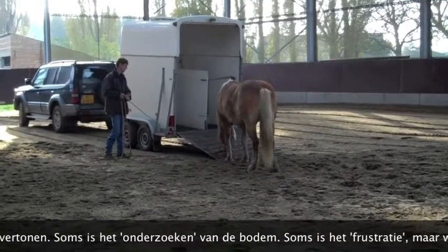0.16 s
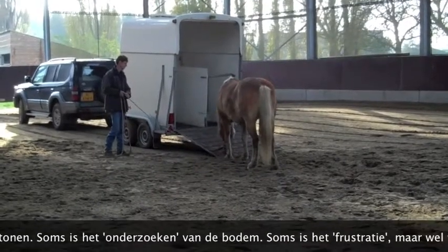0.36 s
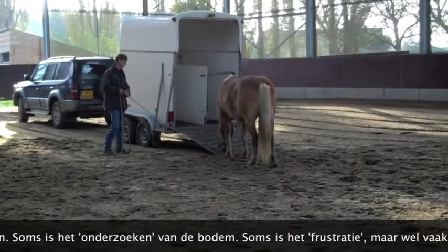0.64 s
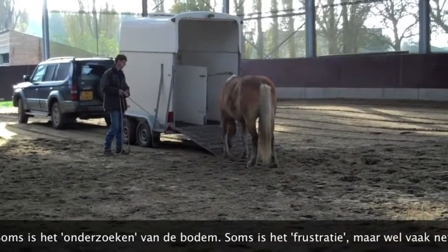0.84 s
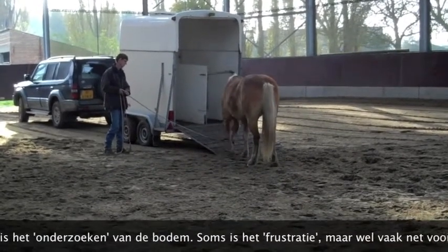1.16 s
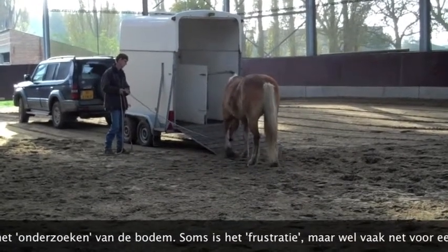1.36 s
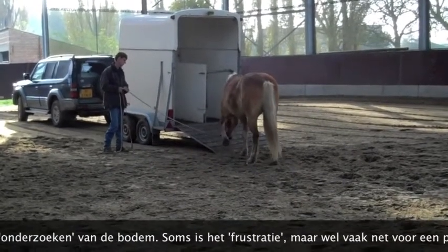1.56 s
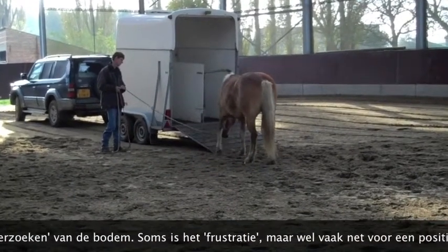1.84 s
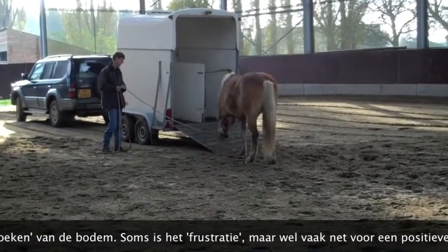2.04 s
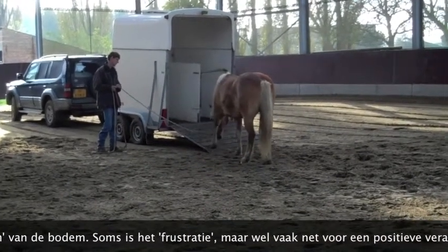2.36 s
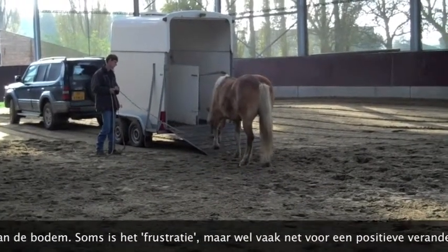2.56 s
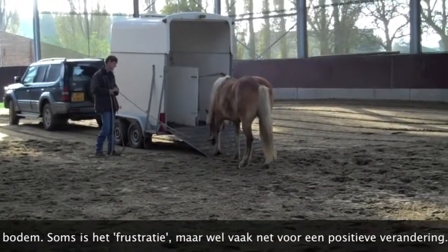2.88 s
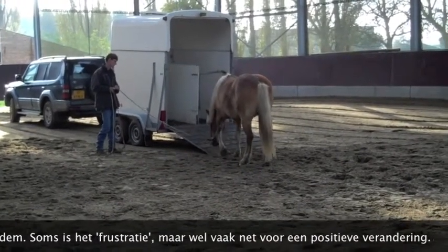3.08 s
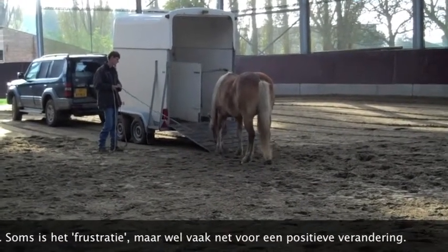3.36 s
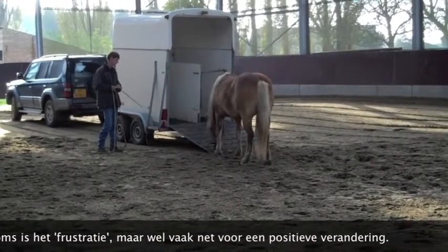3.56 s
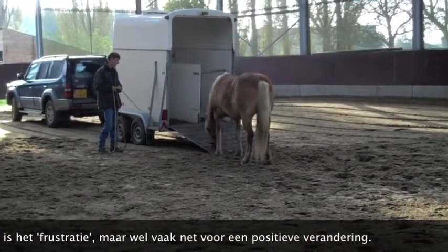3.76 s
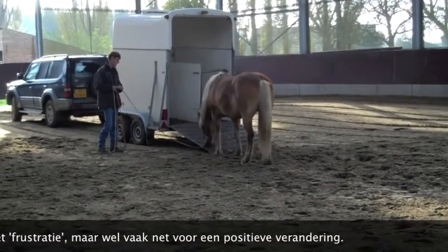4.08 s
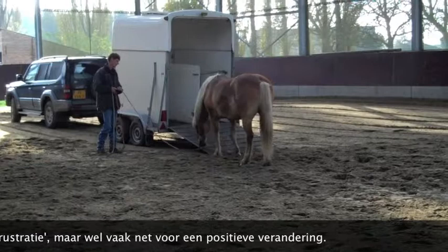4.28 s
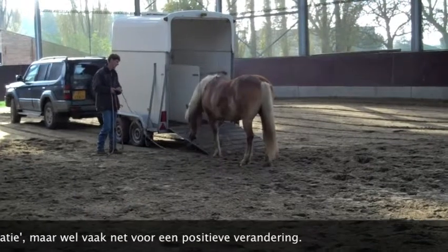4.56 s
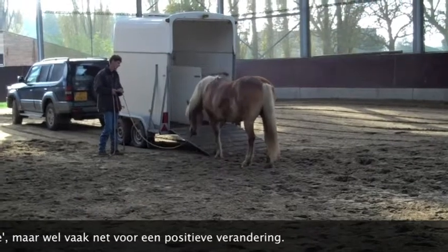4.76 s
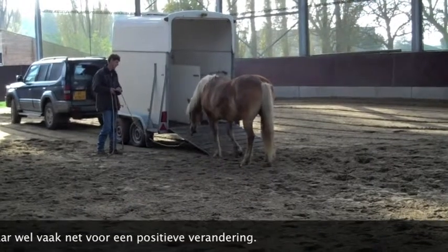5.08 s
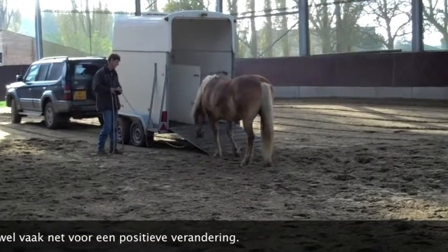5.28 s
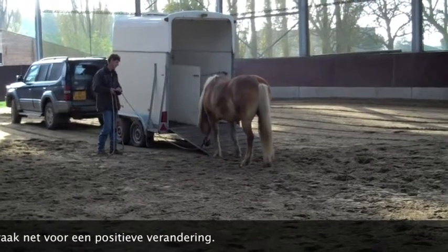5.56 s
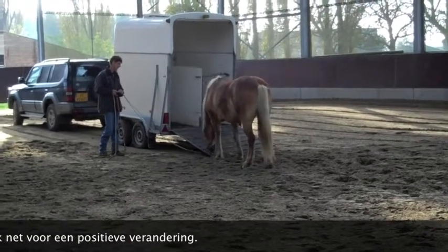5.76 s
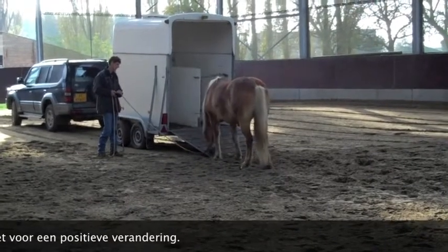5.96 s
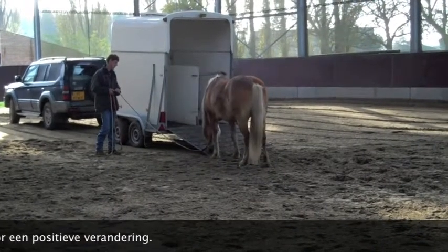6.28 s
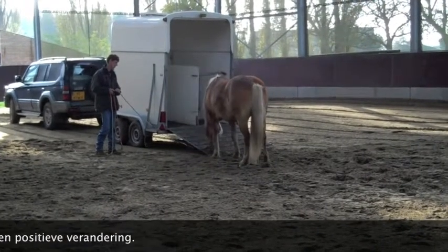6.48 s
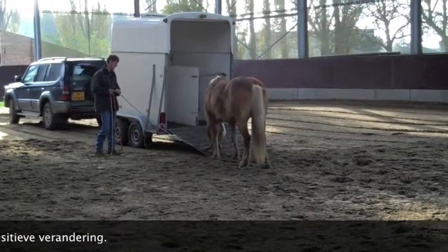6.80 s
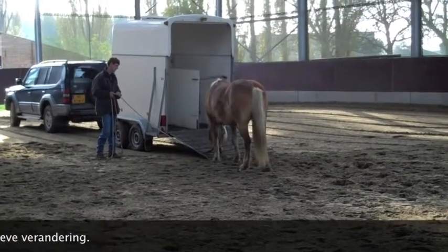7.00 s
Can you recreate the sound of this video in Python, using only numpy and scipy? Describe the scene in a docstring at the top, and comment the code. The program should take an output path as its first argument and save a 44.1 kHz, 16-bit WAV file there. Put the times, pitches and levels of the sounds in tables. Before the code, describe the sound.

Violent hollow slams of a horse pawing a trailer ramp, then a gritty scrape, amid faint sand scuffs, bird chips and quiet outdoor air.

```python
"""Over a faint outdoor wash, hooves scuff in sand and a small bird chips in a covered riding arena.
Then a horse paws at the lowered ramp of an empty trailer: each knock is a click, crushed grit and deck modes.
The ramp slams into its steel fittings, and the hollow box booms through the hall as noise and damped modes.
The hoof also drags over the deck as filtered grains that stir a rattle; small ticks and bumps come later."""
import sys
import numpy as np
from scipy import signal
from scipy.fft import rfft, irfft, next_fast_len
from scipy.io import wavfile

SR = 44100
rng = np.random.default_rng(int(sys.argv[2]) if len(sys.argv) > 2 else 0)


def log_audio(samples):
    """Write samples as a 16-bit WAV file to the path given in sys.argv[1]."""
    # one column per channel
    frames = np.atleast_2d(samples).T
    # limit to full scale, then quantise
    limited = np.clip(frames, -1, 1)
    pcm = np.round(limited * 32767).astype(np.int16)
    wavfile.write(sys.argv[1], SR, pcm)


N = 314599

# Hoof landings on the ramp. Each row: start in seconds, force in dB, knock on the deck in dB,
# share of gritty crunch in dB, share of panel ring in dB.
LANDINGS = [(1.7236, 1.5, -33, 2.5, 0.5), (2.2375, -4, -19.5, -18.5, -3), (2.271, -9, -22.5, -24, -9),
            (2.6896, -24.5, -43, -8, 7.5), (2.9006, -21, -45.5, 6, 5), (4.7945, -1, -27, -16.5, -2)]
# Spectrum of crushed grit. Each row: frequency in Hz, relative density in dB per Hz.
GRIT_SPECTRUM = [(100, -15.5), (400, 3), (1400, -1), (2400, 1.5), (4200, -4.5), (7300, -1.5), (9500, -14),
                 (14000, -33.5)]
# Spectrum of the booming box. Each row: frequency in Hz, relative density in dB per Hz.
BOOM_SPECTRUM = [(25, -39), (50, -28.5), (95, -7.5), (200, -2.5), (310, 0), (590, -4), (720, -3.5),
                 (1050, -10.5), (2200, -8.5), (3150, -10.5), (4400, -12.5), (7300, -8.5), (9500, -25.5),
                 (14000, -38)]
# Reverberation of the arena. Each row: frequency in Hz, time to decay by 60 dB in seconds.
HALL_DECAY = [(60, 2.2), (160, 1.78), (420, 1.4), (1100, 1.36), (2200, 1.043), (4000, 0.77), (7700, 0.65),
              (13000, 0.57)]
# Coherence of the two channels in diffuse sound. Each row: frequency in Hz, coherence from 0 to 1.
COHERENCE = [(60, 0.91), (300, 0.99), (650, 0.94), (1400, .85), (3000, 0.5), (6500, 0), (14000, 0.6)]
# The ramp gives for this long under the hoof before it bottoms out on its fittings.
GIVE_S = .015


def gain_of(db):
    """Decibels are logarithmic: every 20 dB is a factor of ten in amplitude."""
    return 10 ** (np.asarray(db) / 20)


def evened(x):
    """Root-mean-square normalization: equal power whatever the waveform."""
    return x / np.sqrt(np.mean(x ** 2) + 1e-20)


def read(points, hz):
    """Interpolation on a logarithmic frequency axis, where equal steps are equal ratios."""
    f, value = np.transpose(points)
    return np.interp(np.log(hz + 1), np.log(f + 1), value)


def clock(length):
    """Uniform sampling: the sample times of a span of seconds."""
    return np.arange(int(length * SR)) / SR


def add(mix, s, sound):
    """Superposition: pressures add from a start time in seconds."""
    part = mix[..., max(round(s * SR), 0):][..., :sound.shape[-1]]
    part += sound[..., :part.shape[-1]]


def colour(x, points):
    """Linear filtering: each frequency is scaled by a table of dB."""
    size = next_fast_len(x.shape[-1])
    gain = gain_of(read(points, np.fft.rfftfreq(size, 1 / SR)))
    return irfft(rfft(x, size) * gain, size)[..., :x.shape[-1]]


def diffuse(size, likeness=1):
    """Diffuse field: noise from all around reaches two ports with partial coherence."""
    hz = np.fft.rfftfreq(size, 1 / SR)
    same = np.clip(likeness * read(COHERENCE, hz), 0, 1)
    mid, side = rfft(rng.standard_normal((2, size))) * np.sqrt([(1 + same) / 2, (1 - same) / 2])
    return hz, np.array([mid + side, mid - side])


def ring(modes, length):
    """Modal synthesis: a struck object is a sum of damped sines of alternating sign."""
    t = clock(length)
    out = 0
    for k, (hz, db, t60) in enumerate(modes):
        decay = np.exp(-np.log(1000) * t / t60)
        out = out + gain_of(db) * decay * np.sin(2 * np.pi * hz * t) * (-1) ** k
    return out


def tail(spectrum, tilt_db=0, rise=0.014, early_db=0, early_t60=0.2):
    """Two-slope decay: the box dies fast, the hall slowly, and bass builds up later than treble."""
    t = clock(2)
    hz, z = diffuse(len(t))
    shape = evened(gain_of(read(spectrum, hz)))
    tilt = gain_of(tilt_db * np.log2((hz + 20) / 1000))  # dB per octave
    z = z * shape * tilt
    centres = np.geomspace(60, 13000, 10)
    out = 0
    for centre, own in zip(centres, np.eye(len(centres))):
        # triangular bands overlap and sum to one
        band = irfft(z * read(np.c_[centres, own], hz), len(t))
        hall = 1e-6 ** (t / read(HALL_DECAY, centre))
        box = gain_of(2 * early_db) * 1e-6 ** (t / early_t60)
        build_up = 1 - np.exp(-t / (rise * (300 / centre) ** .5))
        out = out + band * np.sqrt(hall + box) * build_up
    return out


def arena(x, wet_db):
    """Room impulse response: direct sound, a few distinct echoes and the long wash of the hall."""
    # First echoes from the box and the arena wall. Each row: nominal delay in seconds, level in dB.
    first_echoes = [(.0025, -10), (.0125, -23.5), (.022, -14), (.027, -16.5), (.035, -15), (.057, -19)]
    response = tail([(20, 0), (20000, 0)])
    response *= gain_of(wet_db) / np.linalg.norm(response[0])
    response[:, 0] += 1
    for delay, db in first_echoes:
        for side in response:
            side[int(delay * rng.uniform(.98, 1.02) * SR)] += gain_of(db)
    return signal.fftconvolve(x[None], response, axes=1)[:, :N]


def outdoors(level_db=-56.5, balance_db=1.43):
    """Diffuse broadband noise: a faint, slowly drifting wash of distant air through the open sides."""
    # Spectrum of the wash. Each row: frequency in Hz, relative density in dB per Hz.
    wash_spectrum = [(20, -28.5), (35, -12), (85, -6), (125, -9.5), (260, -3.5), (470, -6.5), (750, -2),
                     (1250, -4), (2000, -6.5), (3200, -12), (5200, -13.5), (7800, -11.5), (9500, -18),
                     (14000, -18)]
    # Slow drift of the wash. Each row: time in seconds, change of level in dB.
    drift_points = [(0, -.3), (3.6, -.9), (6, -1.7), (6.9, -.3)]
    hz, z = diffuse(next_fast_len(N), likeness=0.54)
    wash = evened(irfft(z * gain_of(read(wash_spectrum, hz)))[:, :N])
    drift_db = np.interp(np.arange(N) / SR, *np.transpose(drift_points))
    return wash * gain_of(level_db + drift_db) * gain_of([[balance_db], [-balance_db]])


def rub(length, spectrum, grain_db):
    """Granular friction: countless grains, a few larger than the rest, in a quick swell and a fade."""
    size = int(length * SR)
    grain_size = np.minimum(rng.exponential(1, SR), 5)
    grains = rng.standard_normal(SR) * gain_of(grain_db * grain_size)
    stroke = np.sin(np.pi * np.linspace(0, 1, size, endpoint=False) ** 0.59) ** 0.6
    return evened(colour(grains, spectrum))[:size] * stroke


def shuffling():
    """Granular flow: loose sand hisses and crunches as the feet shift."""
    # Hooves shift in the sand. Each row: start in seconds, length in seconds, level in dB,
    # share of dull crunch in dB.
    scuffs = [(0, 0.081, -68, 2), (0.186, 0.086, -61, -18), (0.329, 0.3, -68.5, -15.5),
              (1.2, 0.25, -70, -6), (3.70, 0.29, -59, -2.5), (4.266, 0.17, -68, -18),
              (6.091, 0.32, -61.5, -0.5)]
    # Spectra of hiss and of dull crunch. Each row: frequency in Hz, relative density in dB per Hz.
    sand_spectrum = [(100, -24), (1500, -15), (2700, -7), (4300, -4.5), (6000, 0), (7500, 0), (9500, -13.5),
                     (14000, -19.5)]
    crunch_spectrum = [(50, -17), (260, -2.5), (480, -2.5), (720, 1), (1300, -5), (3000, -9), (8000, -35.5)]
    out = np.zeros(N)
    for s, length, db, dull_db in scuffs:
        hiss = rub(length, sand_spectrum, grain_db=1.5)
        crunch = rub(length, crunch_spectrum, grain_db=6.5)
        add(out, s, gain_of(db) * (hiss + gain_of(dull_db) * crunch))
    return arena(out, wet_db=0)


def bird(top_hz=8400, bottom_hz=4600, scatter_s=.006, gap_s=.035):
    """Frequency sweep and scattering: each fast falling chip is smeared by reflections under the roof."""
    # Bird calls, each a pair of chips. Each row: start in seconds, level in dB.
    calls = [(0.871, -51.5), (1.023, -57.5), (1.127, -54), (3.243, -48), (5.324, -54.5), (7.036, -52.5)]
    out, t, later = np.zeros(N), clock(.008), clock(.03)
    turns = np.cumsum(np.linspace(top_hz, bottom_hz, len(t))) / SR
    sweep = np.sin(2 * np.pi * turns) * np.hanning(len(t))
    for s, db in calls:
        for start in (s, s + gap_s):
            paths = rng.standard_normal(len(later)) * np.exp(-later / scatter_s)
            paths /= np.linalg.norm(paths)
            paths[0] += 1  # direct path
            add(out, start, gain_of(db) * signal.fftconvolve(sweep, paths) / np.sqrt(2))
    return arena(out, wet_db=-1.0)


def hoof(click_db=-7, click_s=0.00049, crunch_s=0.014):
    """Impact excitation: a hard click, crushed grit and the short hollow note of the deck modes."""
    # Modes of the deck. Each row: frequency in Hz, relative level in dB, 60 dB decay time in seconds.
    deck_modes = [(302, -11.5, .05), (716.4, -0.5, 0.04), (835, -8.5, 0.016), (1520, -15, .03),
                  (2200, -17, 0.011), (2970, -8.5, 0.0046)]
    out, t = np.zeros(N), clock(.1)
    for s, _, db, crunch_db, _ in LANDINGS:
        click = gain_of(click_db) * np.exp(-t / click_s)
        crunch = gain_of(crunch_db) * np.exp(-t / crunch_s)
        grit = evened(colour(rng.standard_normal(len(t)), GRIT_SPECTRUM))
        add(out, s, gain_of(db) * (ring(deck_modes, .1) + (click + crunch) * grit))
    return arena(out, wet_db=-7)


def clash(length, tilt_db, crack_db=-5.5):
    """Contact chatter drives modes: steel strikes steel for a few milliseconds and rings briefly."""
    # Modes of the fittings. Each row: frequency in Hz, relative level in dB,
    # 60 dB decay time in seconds.
    steel_modes = [(2192, -12, 0.0091), (2913, -1.5, .015), (3523, 0, 0.0148), (4380, -2.5, 0.0065),
                   (5150, -3.5, .007), (5900, -1.5, .008), (6600, -5.5, 0.021), (7400, -10.5, .007)]
    steel, t = ring(steel_modes, .04), clock(0.038)
    contact = np.exp(-(t / length) ** 2)
    # hard contacts excite all frequencies alike: keep the phases, flatten the magnitudes
    phases = np.angle(rfft(contact * rng.standard_normal(len(t))))
    chatter = contact * irfft(np.exp(1j * phases), len(t))
    clang = evened(signal.fftconvolve(chatter, steel))
    crack = evened(colour(np.pad(chatter, (0, len(steel) - 1)), GRIT_SPECTRUM))
    brightness = [(3200, 0), (6400, tilt_db), (9000, tilt_db), (14000, tilt_db - 6)]
    sound = colour(clang + gain_of(crack_db) * crack, brightness)
    return sound / np.linalg.norm(sound) * np.sqrt(length * SR / 2)


def fittings(bright_db=1, dull_db=-12.5):
    """Nonlinear contact: the fittings rattle, clash and bounce once, brighter under harder blows."""
    # levels at a force of 0 dB; delays in seconds, the bounce counted from the clash
    loose_s, loose_db, loose_length_s = .0095, -27, .009
    clash_db, clash_length_s = -14, .0058
    bounce_s, bounce_db, bounce_length_s = .003, -16.5, 0.0036
    # dB per dB of force: level of clash and bounce, level of the loose rattle, treble of the clash
    clash_growth, loose_growth, brightens = 1.29, 3.3, 0.785
    out = np.zeros(N)
    for s, force_db, *_ in LANDINGS:
        db = clash_growth * force_db
        tilt_db = max(bright_db + brightens * force_db, dull_db)  # glancing contacts stay dull
        loose = gain_of(loose_db + loose_growth * force_db) * clash(loose_length_s, dull_db)
        slam = gain_of(clash_db + db) * clash(clash_length_s, tilt_db)
        bounce = gain_of(bounce_db + db) * clash(bounce_length_s, (tilt_db + dull_db) / 2)
        add(out, s + loose_s, loose)
        add(out, s + GIVE_S, slam)
        add(out, s + GIVE_S + bounce_s, bounce)
    return arena(out, wet_db=-11.0)


def sheet(count):
    """High modal density: the many close modes of the thin walls, in its own mix at each port."""
    t, out = clock(1.3), 0
    for place, first, second in rng.random((count, 3)):
        hz = 900 * (8500 / 900) ** (place ** .7)
        # less coherence allows a wider phase difference between the ports
        apart = 2 * np.pi * (second - .5) * np.sqrt(np.clip(1 - read(COHERENCE, hz), 0, 1))
        phase = 2 * np.pi * first + np.array([[0], [apart]])
        decay = np.exp(-np.log(1000) * t / read(HALL_DECAY, hz))
        out = out + gain_of(read(BOOM_SPECTRUM, hz)) * decay * np.sin(2 * np.pi * hz * t + phase)
    return out / np.sqrt(count) * (1 - np.exp(-t / 0.0022))


def trailer(boom_db=-21, panel_db=-29, sheet_db=-15, tilt_db=0.38, brightens=0.11, swell_s=0.014):
    """Cavity and panel resonance: each slam rings the panels; the boom swells and fills the hall."""
    # Modes of the box panels. Each row: nominal frequency in Hz, relative level in dB,
    # longest 60 dB decay time in seconds.
    panel_modes = [(47, -26.5, 0.58), (104.6, -12, 1.1), (167.4, -12.5, 1.1), (199.5, -7, 1.3),
                   (264.4, -0.5, 0.68), (306, 2, 0.69), (335.3, -3, 0.37), (398.3, -8.5, 1.86),
                   (486.5, -4.5, .7), (545, -7.5, 0.88), (681, 0.5, 0.66), (775, -4.5, 0.68),
                   (1238, -10.5, .8), (1277, -20, 1), (1530, -10.5, 1.3), (1608, -11, 0.91),
                   (2140, -15, 1.2), (2645, -8, 2.2), (2810, -13, .6), (3120, -15.5, 0.7),
                   (3250, -11.5, 0.6)]
    out, t, walls = np.zeros((2, N)), clock(2), sheet(count=220)
    for s, force_db, _, _, ring_db in LANDINGS:
        tilt = tilt_db + brightens * force_db  # dB per octave
        boom = tail(BOOM_SPECTRUM, tilt, rise=swell_s, early_db=-1.5, early_t60=.45)
        # each landing spot shifts the modes a little; no panel outlasts the hall
        modes = [(hz * rng.normal(1, .003), level, min(t60, read(HALL_DECAY, hz)))
                 for hz, level, t60 in panel_modes]
        panels = ring(modes, 2) * (1 - np.exp(-(t / swell_s) ** 2))
        add(out, s + GIVE_S, gain_of(force_db + boom_db) * boom)
        add(out, s + GIVE_S, gain_of(force_db + sheet_db) * walls)
        add(out, s + GIVE_S, gain_of(force_db + ring_db + panel_db) * panels)
    return out


def scraping(rattle_db=-2):
    """Stick-slip friction: grit catches and slips between hoof and deck, which rattles under it."""
    # Hoof drags over the gritty deck. Each row: start in seconds, length in seconds, level in dB.
    drags = [(2.736, 0.054, -46.5), (2.84, .07, -54), (2.91, .15, -46.5)]
    # Modes that a dragging hoof stirs in the deck. Each row: frequency in Hz, relative level in dB,
    # 60 dB decay time in seconds.
    rattle_modes = [(340, 3, 0.023), (1310, 0, 0.032), (1490, 0, 0.032), (1760, 1.5, .02),
                    (2174, -4.5, 0.053), (2750, -7, 0.022), (4440, -0.5, .025), (4900, -11.5, 0.028),
                    (5395, -2.5, .025), (6710, -2.5, .02), (7010, -9, 0.026), (7500, -5, 0.018)]
    out, deck = np.zeros(N), ring(rattle_modes, .08)
    for s, length, db in drags:
        grit = rub(length, GRIT_SPECTRUM, grain_db=3.5)
        rattle = signal.fftconvolve(rub(length, GRIT_SPECTRUM, grain_db=4), deck)
        rattle *= np.sqrt(len(grit)) / np.linalg.norm(rattle)
        add(out, s, gain_of(db) * grit)
        add(out, s, gain_of(db + rattle_db) * rattle)
    return arena(out, wet_db=-1)


def close_by(tick_hz=6800, tick_s=0.000078, bump_hz=250, bump_s=0.0023):
    """Near field: dry ticks and soft bumps beside the microphone carry no reverberation."""
    # Small ticks and soft low bumps. Each row: start in seconds, level in dB.
    tick_rows = [(4.265, -34), (4.269, -43), (4.323, -43)]
    bump_rows = [(6.395, -50), (6.412, -47.5)]
    out, t = np.zeros(N), clock(.05)
    for rows, hz, fade in ((tick_rows, tick_hz, tick_s), (bump_rows, bump_hz, bump_s)):
        pulse = np.sin(2 * np.pi * hz * t) * t / fade * np.exp(1 - t / fade)
        for s, db in rows:
            add(out, s, gain_of(db) * pulse)
    return out


def scene():
    """Superposition at two microphone ports, each with its own frequency response."""
    # Colour of the left and right ports. Each row: frequency in Hz, gain in dB.
    left_port = [(60, 3), (400, 2.15), (4500, 1.66), (6200, 0.5), (7800, 9.5), (9500, 6.5), (14000, 0)]
    right_port = [(60, 4), (400, 1), (4500, 0.5), (6200, 4.5), (7800, -5), (9500, -10.5), (14000, -8.5)]
    sound = shuffling() + bird() + hoof() + fittings() + trailer() + scraping() + close_by()
    return np.array([colour(sound[0], left_port), colour(sound[1], right_port)]) + outdoors()


def record(dry):
    """Band limiting and soft saturation: deep rumble is cut, high peaks rounded, the top band removed."""
    dry = signal.sosfilt(signal.butter(4, 36, "highpass", fs=SR, output="sos"), dry)
    rounded = dry / (1 + (dry / .85) ** 6) ** (1 / 6)
    low_pass = signal.firwin(511, 14250, window=("kaiser", 9), fs=SR)  # cutoff in Hz
    return signal.oaconvolve(rounded, low_pass[None], "same")


dry = scene()
out = record(dry)
log_audio(out)
```